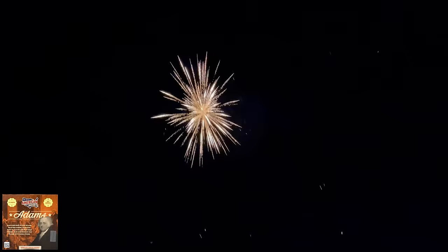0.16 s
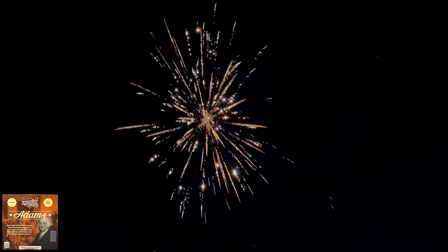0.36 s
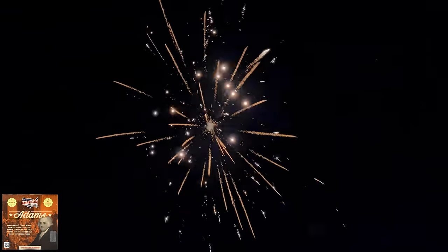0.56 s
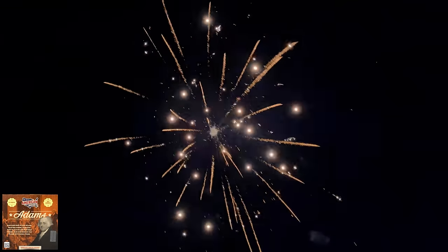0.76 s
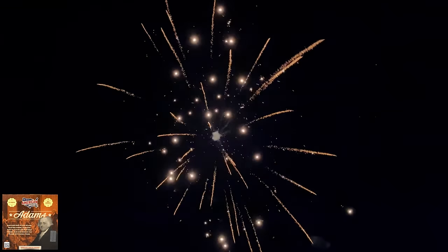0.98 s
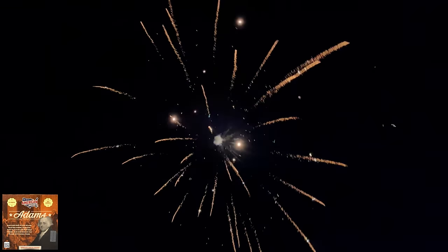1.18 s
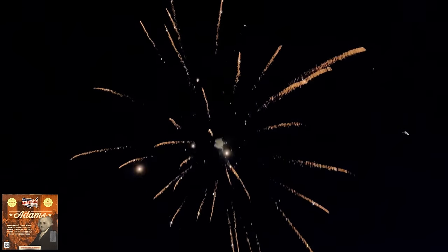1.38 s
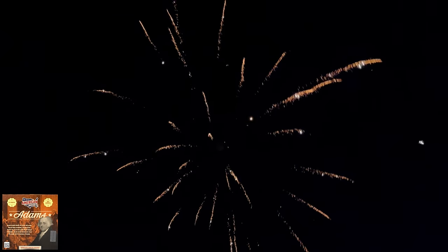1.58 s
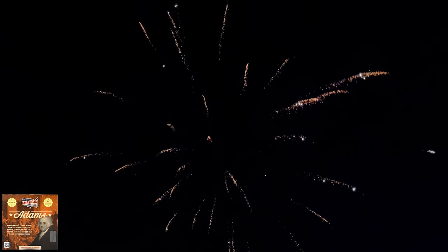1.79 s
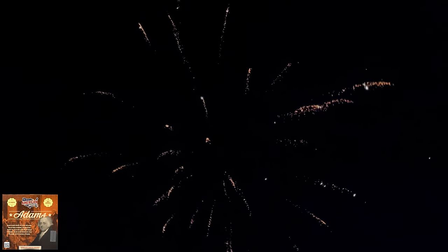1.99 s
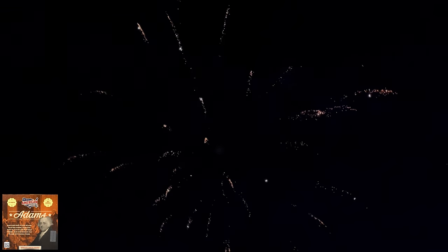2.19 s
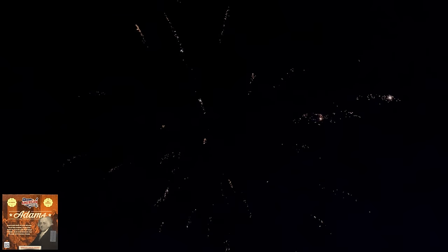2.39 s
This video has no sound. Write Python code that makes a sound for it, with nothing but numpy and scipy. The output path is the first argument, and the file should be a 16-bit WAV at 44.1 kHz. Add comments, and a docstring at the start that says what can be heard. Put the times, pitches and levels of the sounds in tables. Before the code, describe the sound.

A firework bursts overhead with a loud, sharp bang that rolls away across the landscape. Faint fuse ticks follow, then the next shot launches with a double crack and short echo. The bangs overload the microphone in quiet night air.

```python
"""Faint night air, then almost at once a firework shell bursts overhead and its echo rolls away.
The fuse of the firework cake sputters, and the next tube fires with a double crack and a short echo.
Each bang is a few shock waves and close reflections: a steep push of air that flips into suction.
The ground scatters them, and houses, trees and the far landscape send them back.
The bangs overload a small microphone, whose gain control dips and slowly recovers."""
import sys
import numpy as np
from scipy import signal
from scipy.fft import irfft
from scipy.io import wavfile

SR = 44100
rng = np.random.default_rng(int(sys.argv[2]) if len(sys.argv) > 2 else 0)


def inscribe(sig):
    """Save sig as 16-bit PCM at rate SR to the path in sys.argv[1].

    A 1-D sig is mono; a 2-D sig holds one channel per row.
    Samples are clipped to [-1, 1] before scaling.
    """
    pcm = np.round(np.clip(np.atleast_2d(sig).T, -1, 1) * 32767)
    wavfile.write(sys.argv[1], SR, pcm.astype(np.int16))


N = 108045

# Tone of the night air: (frequency [Hz], level [dB])
NIGHT_TONE = [(20, -46), (40, -21), (60, -20), (98, -0.5), (140, -5), (220, -7), (450, -11), (650, -19.5),
              (1000, -16.5), (1850, -31.5), (2200, -25.5), (2600, -30.5), (4000, -30), (6500, -35.5),
              (10000, -45.5), (16000, -61.5)]
# Long rumble from the far landscape: (frequency [Hz], level [dB], time to fade by 60 dB [s])
FAR_RUMBLE = [(40, -24.5, 4.5), (109, -4.5, 8.2), (241.2, 0.5, 5), (450, -6.5, 6.2), (750, -21, 6.8),
              (1050, -13, 4), (1550, -18, 5.7), (2400, -16, 3.82), (4500, -19, 2.5), (9000, -45, 1.5),
              (16000, -57.5, 1)]
# Rolling echo of the burst: (frequency [Hz], level [dB], time to fade by 60 dB [s])
BURST_ROLL = [(30, -25, 0.65), (71, -35, 1), (130.3, -5.5, 1.6), (227, 2.5, 1.32), (420, 1.5, 1.27),
              (648, -5.5, 1), (1060, -8.5, 0.87), (1750, -18.5, 1.23), (3000, -21.5, 1.03),
              (4800, -23.5, 1.23), (8000, -29.5, 0.74), (12000, -39, .45), (16000, -42.5, .3)]
# Short echo of the launch: (frequency [Hz], level [dB], time to fade by 60 dB [s])
LAUNCH_ROLL = [(30, -45, .8), (100, -2.5, 1), (280, 0.5, 0.88), (600, -8.5, 1), (1000, -9.5, 0.79),
               (2000, -11.5, 0.6), (4500, -13, 0.57), (9000, -27, 0.72), (16000, -40, .42)]
# Bands that ring out of the roll and sink in pitch as echoes come from farther away: (final pitch [Hz],
# drop [Hz], sink time [s], width [Hz], strength [dB], clearest after [s], stays clear for [s])
SINKING_BANDS = [(790, 520, .21, 100, 13, .25, .5), (1540, 520, .32, 65, 17, .5, .33),
                 (2190, 1300, .3, 130, 8, .9, .7)]
# Single echoes from houses and trees, and at 1.729 s and 1.861 s two distant thuds: # (time [s], level [dB],
# rise [s], decay [s], treble cut [Hz], treble boost [dB])
SINGLE_ECHOES = [(.356, -23, 0.00067, 0.0026, 5500, 11.5), (0.502, -28.5, 0.0097, 0.046, 1910, -22),
                 (0.554, -32.5, 0.011, 0.012, 2000, -15), (0.649, -40.5, 0.0034, 0.011, 1000, -2),
                 (0.707, -39.5, 0.0022, 0.019, 5350, -4), (.734, -37, 0.014, 0.032, 4400, -2.5),
                 (0.951, -46.5, 0.033, 0.051, 692, -4), (1.15, -51.5, 0.0029, 0.02, 3980, -9),
                 (1.215, -51, 0.0031, 0.017, 2500, -0.5), (1.729, -53.5, 0.0036, 0.018, 1000, -11),
                 (1.861, -49.5, 0.0034, .008, 990, -9), (2.252, -37, 0.0014, 0.0049, 8000, -2.5),
                 (2.3178, -36, 0.0011, .0025, 9000, 19), (2.327, -48.5, 0.015, 0.023, 9000, 17)]
# Tone those echoes share: (frequency [Hz], level [dB])
ECHO_TONE = [(30, -42), (70, -37.5), (130, 3), (350, 5.5), (650, -3.5), (1500, -21.5), (5000, -12.5),
             (16000, -34)]
# Short noises: snaps, ticks, thuds and, at 2.1547 s, a brief swell of hiss that leads into the crack:
# (time [s], level [dB], pitch [Hz], width [octaves], swell [s])
SHORT_NOISES = [(0.2312, -13, 8000, 0.51, 0.00039), (.2391, -20, 7560, .8, 0.00019),
                (0.2498, -20, 3800, 0.38, .0004), (.735, -40, 151, 0.5, 0.0093),
                (1.84, -63.5, 10740, 0.27, 0.00024), (2.053, -56.5, 1524, 0.18, .001),
                (2.0736, -49, 1590, .3, 0.00051), (2.074, -55, 4220, 0.21, .0005),
                (2.074, -44.5, 280, 0.42, 0.0029), (2.1, -61, 5000, .35, 0.00072),
                (2.114, -59, 5130, .35, 0.00045), (2.1547, -23.5, 1430, 1.5, 0.006),
                (2.1608, 2.5, 5940, 0.27, 0.00027), (2.159, -8, 1180, .3, .0008),
                (2.1844, -21, 5440, .6, 0.0011)]
# Tone of the sound scattered by the ground nearby: (frequency [Hz], level [dB])
GROUND_TONE = [(60, -11), (200, 0.5), (550, 2.5), (950, 2), (2000, -7), (5000, -7), (9000, -20.5),
               (16000, -31)]
# Shock waves and close reflections: (time [s], level [dB], push [s], suction [s], ground scatter [dB])
SHOCK_WAVES = [(0.2314, -3.5, 0.00037, 0.0017, -27), (0.2349, -4, 0.00033, 0.0031, -5),
               (0.237, 13, 0.0016, 0.00084, 3), (0.2481, -2.5, 0.00058, .0013, 10.5),
               (2.1619, 3, .0003, 0.004, 0), (2.18, -4, 0.000083, 0.000074, 9),
               (2.182, 1.5, 0.00068, 0.0021, 7)]

BURST_S, LAUNCH_S = .233, 2.162  # when the rolling echoes start


def amp(db):
    """Turns decibels into a factor to multiply by."""
    return 10 ** (np.asarray(db) / 20)


def unit(x):
    """Scales a signal to an average (rms) size of 1."""
    return x / np.sqrt(np.mean(x ** 2) + 1e-20)


def look_up(table, hz, column=1):
    """Reads a table column at any frequency, blending between rows on a log scale."""
    columns = np.transpose(table)
    return np.interp(np.log(hz + 1), np.log(columns[0] + 1), columns[column])


def add(mix, start, sound):
    """Mixes a sound in at a start time in seconds."""
    part = mix[round(start * SR):][:len(sound)]
    part += sound[:len(part)]


def noise(tone, size):
    """Noise whose balance of low and high follows tone(hz), in dB."""
    hz = np.fft.rfftfreq(size, 1 / SR)
    return unit(irfft(amp(tone(hz)) * np.exp(2j * np.pi * rng.random(len(hz))), size))


def wander(seconds):
    """A smooth random curve that changes over about the given time."""
    return noise(lambda hz: -20 * np.log10(1 + (2 * hz * seconds) ** 2), N)


def night_air():
    """Faint distant rumble and hiss that waver a little in level."""
    return noise(lambda hz: look_up(NIGHT_TONE, hz), N) * amp(-59 + 2 * wander(seconds=.03))


def rolling_echo(start, table, bands, level_db, rise_s):
    """Countless reflections merge into a lumpy roll whose treble dies first."""
    t, out = np.arange(N) / SR, np.zeros(N)
    hz, age, spectrum = signal.stft(rng.standard_normal(N), SR, nperseg=512, noverlap=384)
    hz = hz[:, None]
    gain = unit(amp(look_up(table, hz))) * amp(-60 * age / look_up(table, hz, column=2))
    for final, drop, sink, width, strength, clearest, span in bands:
        offset = (hz - final - drop * np.exp(-age / sink)) / width
        peak = np.exp(-offset ** 2) - .3 * np.exp(-(offset / 4) ** 2)  # narrow peak in a wide dip
        gain = gain * amp(strength * peak / (1 + ((age - clearest) / span) ** 2))
    roll = signal.istft(spectrum * gain, SR, nperseg=512, noverlap=384)[1][:N]
    lumps_db = .33 * wander(seconds=.008)
    add(out, start, roll * (1 - np.exp(-t / rise_s)) * amp(level_db + lumps_db))
    return out


def single_echoes():
    """Houses and trees send back smeared, duller copies of the bangs; two distant thuds take the same shape."""
    out, t = np.zeros(N), np.arange(16384) / SR
    for start, db, rise, decay, cut, treble in SINGLE_ECHOES:
        wash = noise(lambda hz: look_up(ECHO_TONE, hz) + treble * hz / (hz + 800)
                     - 10 * np.log10(1 + (hz / cut) ** 6), len(t))
        envelope = np.minimum(t / rise, 1) * np.exp(-np.maximum(t - rise, 0) / decay)
        add(out, start, amp(db) * envelope * wash)
    return out


def short_noises():
    """Puffs of noise sound as snaps, ticks and thuds; a brief swell of hiss leads into the crack."""
    out, t = np.zeros(N), np.arange(4096) / SR
    for start, db, pitch, octaves, swell in SHORT_NOISES:
        hiss = noise(lambda hz: -3 * (np.log2((hz + 1) / pitch) / octaves) ** 2, len(t))
        envelope = t / swell * np.exp(1 - t / swell)
        add(out, start, amp(db) * envelope * hiss)
    return out


def shock_waves():
    """A steep push flips into suction and makes the microphone ring; the ground scatters each wave."""
    mic_low_hz, mic_q, mic_top_hz = 170, 1.3, 8000  # a higher q rings longer
    suction_db, scatter_fade_s = -1, .11
    t = np.arange(8192) / SR
    air, scatter = np.zeros(N), np.zeros(N)
    for start, db, push_s, suction_s, scatter_db in SHOCK_WAVES:
        suction = amp(suction_db) * np.clip(1 - ((t - push_s) / suction_s) ** 2, 0, 1)
        flip = np.clip((t - push_s) * SR, 0, 1)  # 0 during the push, 1 after it
        add(air, start, amp(db) * (1 - flip - flip * suction))
        spray = noise(lambda hz: look_up(GROUND_TONE, hz), len(t)) * amp(-60 * t / scatter_fade_s)
        add(scatter, start, amp(db + scatter_db) * np.sqrt(push_s + suction_s) * spray)
    omega = 2 * np.pi * mic_low_hz
    ringing_bass_cut = signal.bilinear([1, 0, 0], [1, omega / mic_q, omega ** 2], SR)
    air = signal.lfilter(*ringing_bass_cut, air)
    return signal.lfilter(*signal.butter(1, mic_top_hz, fs=SR), air) + scatter


def scene():
    """The burst and the launch, with their echoes, over the night air."""
    echoes = rolling_echo(BURST_S, BURST_ROLL, SINKING_BANDS, level_db=-20, rise_s=.017)
    echoes += rolling_echo(BURST_S, FAR_RUMBLE, SINKING_BANDS, level_db=-42.5, rise_s=.3)
    echoes += rolling_echo(LAUNCH_S, LAUNCH_ROLL, bands=[], level_db=-31.5, rise_s=.016)
    echoes += single_echoes()
    echoes = signal.sosfilt(signal.butter(3, 96, "high", fs=SR, output="sos"), echoes)
    return (shock_waves() + short_noises() + echoes + night_air())[None]


def record(dry):
    """The microphone overloads, its gain dips and recovers, and the deepest bass and top treble go."""
    clip_level, low_cut_hz, top_hz = .7, 36, 16200
    dip_above_db, dip_share, recover_db_per_s, react_s = -21, .15, 25, .064
    x = dry[0] / (1 + (dry[0] / clip_level) ** 4) ** .25  # rounds off the peaks
    power_db = 10 * np.log10(abs(signal.lfilter(np.ones(256) / 256, 1, x ** 2)) + 1e-12)
    fall = np.arange(N) / SR * recover_db_per_s
    held_db = np.maximum.accumulate(power_db + fall) - fall  # jumps to each peak, then sinks
    excess_db = np.maximum(held_db - dip_above_db, 0)
    smoothing = np.exp(-1 / (react_s * SR))
    x = x * amp(-dip_share * signal.lfilter([1 - smoothing], [1, -smoothing], excess_db))
    x = signal.sosfilt(signal.butter(2, low_cut_hz, "high", fs=SR, output="sos"), x)
    treble_cut = signal.firwin(255, top_hz, window=("kaiser", 9), fs=SR)
    return signal.oaconvolve(x, treble_cut, "same")[None]


dry = scene()
out = record(dry)
inscribe(out)
```